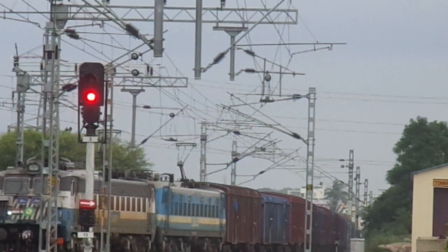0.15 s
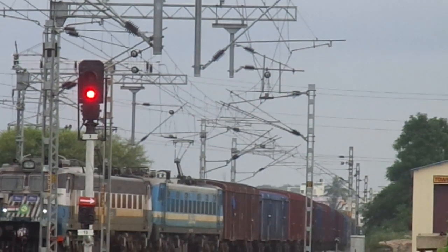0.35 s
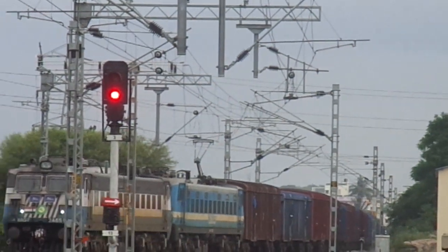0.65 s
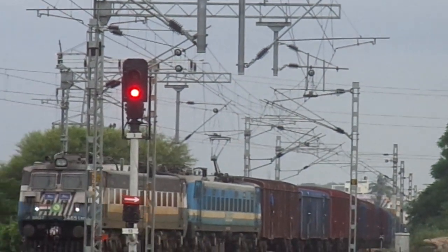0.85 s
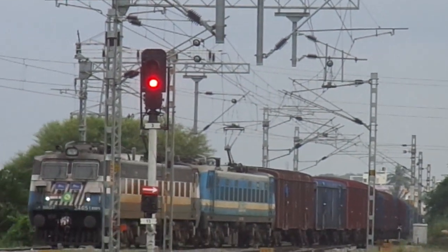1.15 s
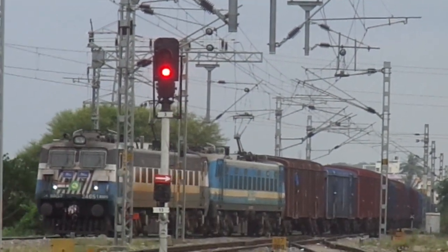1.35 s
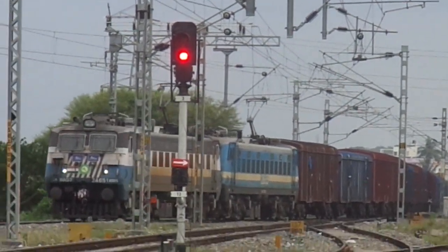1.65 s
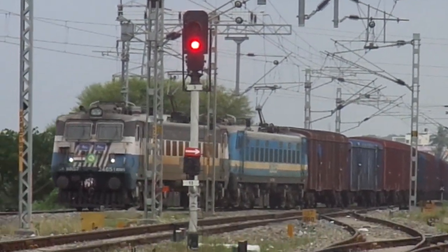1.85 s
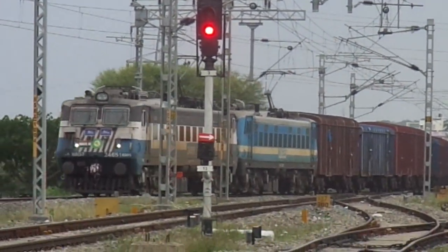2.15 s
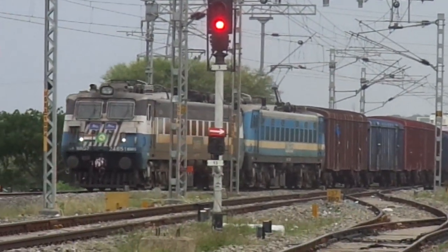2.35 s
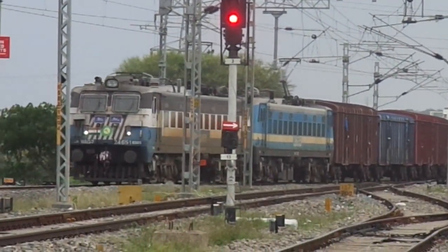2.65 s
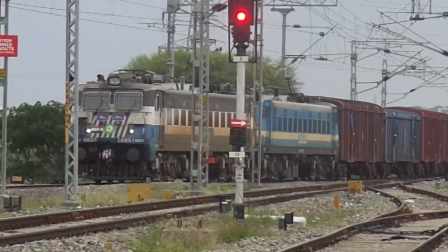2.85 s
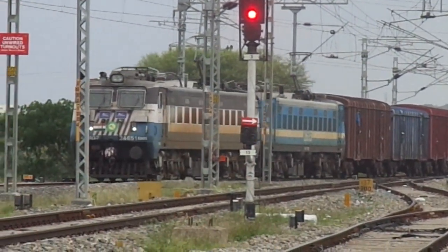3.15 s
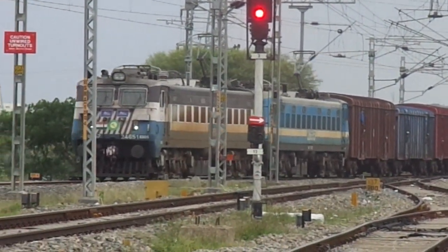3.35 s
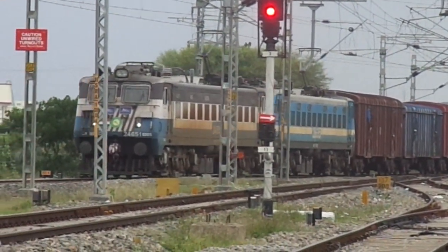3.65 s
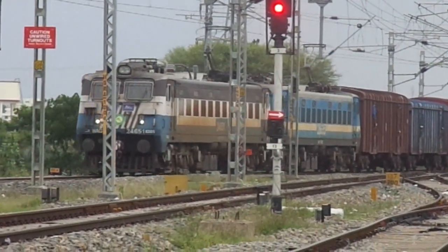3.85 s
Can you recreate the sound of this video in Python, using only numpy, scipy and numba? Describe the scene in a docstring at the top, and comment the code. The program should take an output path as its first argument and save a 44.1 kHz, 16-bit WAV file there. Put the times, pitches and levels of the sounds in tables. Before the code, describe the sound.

A train's loud, brassy air horn blares in three joined blasts across an open, windy railway yard.

```python
"""A railway yard in the open, where a goods train sounds its air horn in three joined blasts.
The horn is a sum of partials on one gliding pitch: slack air raises the pitch and dulls the tone.
Delayed, slightly flat copies and a decaying noise tail are the yard's masts and buildings. Filtered noise
with short thumps is wind on the microphone, gliding sines are a leak and a small bird, and shaped noise
with steady tones is the distant train. A limiter and hard clipping overload the horn's sharp pulses."""
import sys
import numpy as np
from scipy import signal
from scipy.fft import rfft, irfft
from scipy.io import wavfile
from scipy.ndimage import uniform_filter1d, map_coordinates
from numba import njit

SR = 44100
rng = np.random.default_rng(int(sys.argv[2]) if len(sys.argv) > 2 else 0)


def wav_out(sig):
    """Save sig, one row per channel (or a flat mono array), as 16-bit PCM at SR to the path in sys.argv[1]."""
    wavfile.write(sys.argv[1], SR, np.round(np.clip(np.atleast_2d(sig).T, -1, 1) * 32767).astype(np.int16))


N = 176400  # samples, 4 s

# Horn pitch, sharp when the air pressure is low: (time [s], fundamental [Hz])
HORN_PITCH = [(.585, 294), (.61, 291.1), (.67, 288.7), (.92, 289.3), (2.0, 289.1), (2.58, 289.2),
              (2.68, 290.6), (2.78, 294.4), (2.9, 296.8), (2.98, 298.3), (3.025, 293.8), (3.11, 289.4),
              (3.3, 288.5), (3.41, 290), (3.5, 293.4), (3.595, 296.3), (3.65, 292.5), (3.76, 289.9),
              (4.0, 288.6)]
# Horn partials relative to the brass level, interpolated between rows: (partial number, level [dB])
PARTIAL_LEVELS = [(1, -12.5), (2, -14), (5, -9.5), (6, -10.5), (7, -6.5), (8, -8), (9, -13), (10, -11.5),
                  (11, -9), (12, -12), (13, -11), (14, -11), (15, -14.5), (16, -19), (17, -18.5), (18, -15),
                  (20, -19.5), (22, -22), (24, -28), (25, -22.5), (26, -26.5), (27, -28.5), (28, -34),
                  (31, -37), (36, -38.5), (41, -45), (52, -58.5)]
# Third partial, on the bell's main resonance: (time [s], level [dB])
THIRD_PARTIAL = [(.6, -18), (1.15, -18), (1.43, -25), (1.58, -19), (1.8, -18.5), (1.97, -26), (2.28, -15.5),
                 (2.62, -13), (2.82, -16.5), (3.05, -9.5), (3.3, -9.5), (3.5, -16), (3.7, -15), (3.84, -12),
                 (4, -14)]
# Fourth partial: (time [s], level [dB])
FOURTH_PARTIAL = [(.6, -21.5), (1.1, -20), (1.36, -23), (1.52, -18), (1.9, -24), (2.28, -17), (2.42, -27),
                  (2.52, -18), (2.7, -23), (3.2, -27), (3.5, -19), (4, -15.5)]
# The other partials: (time [s], level [dB], brightness about the ninth partial [dB per octave])
BRASS_LEVEL = [(.6, -26, -3), (1.0, -22.5, -2.5), (1.4, -22, -1), (1.8, -22, -1), (2.1, -18.5, 2),
               (2.55, -18.5, 3), (3.05, -14.5, 0), (3.4, -17.5, 1), (3.68, -18.5, -1.5), (3.85, -18.5, -1),
               (4, -17, -1)]
# Broad treble peak that shifts as the train moves: (time [s], centre [Hz], height [dB])
TREBLE_PEAK = [(.6, 3300, 12), (.85, 3300, 4.5), (1.2, 2350, 2), (1.7, 2600, 1.5), (2.1, 3550, -1),
               (2.5, 3140, 3.5), (3.1, 4020, 3), (3.45, 4080, 8.5), (4, 3865, 4)]
# Horn sound scattered on the way, relative to the brass level: (partial number, level [dB])
SCATTERED_PARTIALS = [(1, -27), (2, -23), (3, -21), (5, -17), (6, -18), (9, -21), (12, -24), (16, -32),
                      (24, -42), (32, -54), (52, -68)]
# Spectrum of the air rushing through the horn: (frequency [Hz], level [dB])
AIR_SPECTRUM = [(200, -13), (900, -6), (4000, -7), (8000, -26), (15000, -45)]
# Yard echoes: (delay at time zero [s], Doppler flattening [share of pitch], level [dB], low-pass [Hz])
YARD_ECHOES = [(.07, .0034, -16, 3200), (.16, .012, -17, 3000), (.24, .023, -19, 1300)]
# Wind strength: (time [s], level [dB])
WIND_GUSTS = [(0, -50), (.09, -45), (.2, -55), (.42, -53), (.49, -41), (.6, -50), (.72, -47), (.81, -32),
              (.95, -38), (1.15, -34), (1.27, -23), (1.35, -34), (1.49, -22), (1.57, -28), (1.77, -22),
              (1.88, -33), (2.13, -39), (2.28, -23.5), (2.39, -22), (2.45, -30), (2.66, -31), (2.73, -22),
              (2.9, -33), (3.02, -30), (3.08, -43), (3.35, -39), (3.55, -32), (3.82, -32), (3.88, -21),
              (3.94, -17), (4, -23)]
# Single buffets on the microphone: (time [s], envelope peak [dB])
WIND_BUFFETS = [(.494, -26), (1.04, -19), (1.601, -9), (1.657, -11), (1.792, -11), (2.18, -7), (2.472, -10),
                (2.578, -13), (2.783, -11), (3.024, -12), (3.755, -11), (3.866, -7)]
# Wind rumble spectrum: (frequency [Hz], relative density [dB])
WIND_SPECTRUM = [(20, -30), (50, -16.5), (100, -7.5), (170, 0.5), (280, -0.5), (400, -15), (600, -23.5),
                 (900, -43), (2000, -53), (8000, -82)]
# Bird twitters: (start [s], length [s], first pitch [Hz], last pitch [Hz], level [dB])
BIRD_CHIRPS = [(0.012, 0.031, 5400, 3570, -52.5), (0.064, 0.031, 3700, 5900, -52),
               (0.204, .025, 3870, 4240, -68), (.315, .025, 5500, 4300, -67),
               (0.34, 0.021, 5350, 3900, -53), (0.362, 0.017, 3540, 4300, -54),
               (0.383, .04, 3700, 5850, -54)]
# Repeats of the bird off the yard: (delay [s], level [dB])
BIRD_REPEATS = [(.033, -11), (.075, -22), (.16, -16)]
# Rolling noise and outdoor hiss: (frequency [Hz], relative density [dB])
DISTANT_SPECTRUM = [(20, -9), (40, -4), (90, 1), (350, -25), (520, -8), (1170, -11), (2000, -20),
                    (3200, -21), (6700, -24.5), (7430, -29), (8400, -27), (9200, -18.5), (10000, -32),
                    (15000, -32)]
# Whine of the electric locomotive: (frequency [Hz], mean level [dB])
LOCOMOTIVE_WHINE = [(1278, -62), (2537, -61)]
# Hiss that differs between the ears: (frequency [Hz], relative density [dB])
SIDE_SPECTRUM = [(30, -3), (300, -7), (3000, -19), (15000, -19)]

FULL_AIR_HZ, SLACK_HZ = 290.21, 7.25  # pitch at full pressure; rise when the air is nearly shut
# Loss when nearly shut [dB]; extra loss [dB per octave above the third partial]; exponent on the rise
SLACK_DB, SLACK_DULL_DB, SLACK_POWER = 9, 9, 2.43
VALVE_S, ATTACK_S, AIR_DB = .581, .026, -35  # valve opens; time to open fully; level of the rushing air
PEAK_OCTAVES = .18  # standard deviation of the treble peak
FADE_DB, FADE_RATE, SCATTER_RATE = 2.5, 3.04, 8  # turbulent air on the way; rates in random knots per s
PITCH_JITTER, PHASE_WANDER = .0001, .52  # share of pitch; rad
YARD_DB, YARD_T60_S, YARD_HZ = -28, .8, 2400  # tail level, decay by 60 dB, low-pass
LEAK_START_S, LEAK_LENGTH_S = .495, .11
LEAK_FIRST_HZ, LEAK_LAST_HZ, LEAK_DB = 1590, 1562, -50
WIND_FLUTTER_DB, WIND_FLUTTER_RATE = 4, 80  # spread; random knots per s
WIND_EDGE_DB, WIND_EDGE_HZ = -7.5, 420  # rough part of strong gusts
BUFFET_S, BUFFET_HZ, BUFFET_TAIL_S, BUFFET_TAIL_DB = .0022, 268, .0074, -12.5
DISTANT_DB, SIDE_DB = -46.5, -60
# Limiter threshold [amplitude], step down [dB], recovery [dB per s]
LIMIT, LIMIT_STEP_DB, LIMIT_RECOVER_DB_PER_S = 1.5, 2.2, 34
CEILING, TOP_HZ = .98, 15100  # clipping amplitude; upper band limit


def undb(db):
    """Amplitude ratio: 20 dB is a factor of ten."""
    return 10 ** (np.asarray(db) / 20)


def curve(table, at, column=1):
    """Linear interpolation through the rows of a table."""
    table = np.array(table, float)
    return np.interp(at, table[:, 0], table[:, column])


def walk(rate):
    """Band-limited random drift: a cubic spline through `rate` Gaussian knots per second, spread near 1."""
    knots = rng.standard_normal(int(rate * N / SR) + 4)
    place = np.arange(0, N + 64, 64)
    drift = map_coordinates(knots, [1 + place / SR * rate], order=3)
    return np.interp(np.arange(N), place, drift)


def noise(points):
    """Spectral shaping: white noise weighted in frequency by (frequency [Hz], level [dB]), rms 1."""
    hz, db = np.array(points, float).T
    f = np.maximum(np.fft.rfftfreq(N, 1 / SR), 1)
    weight = undb(np.interp(np.log(f), np.log(hz), db))
    y = irfft(rfft(rng.standard_normal(N)) * weight, N)
    return y / y.std()


def band(x, hz, kind="low", order=2):
    """Butterworth filtering: maximally flat in the passband."""
    sos = signal.butter(order, np.minimum(hz, SR / 2 - 1), kind, fs=SR, output="sos")
    return signal.sosfilt(sos, x)


def glide(t, start, length, first_hz, last_hz):
    """Frequency modulation: phase is the integral of a linearly gliding pitch, with rounded ends."""
    u = np.clip((t - start) / length, 0, 1)
    envelope = np.sqrt(2 * np.abs(np.sin(np.pi * u)))
    hz = first_hz + (last_hz - first_hz) * u
    return envelope * np.sin(2 * np.pi * np.cumsum(hz) / SR)


def horn(t):
    """Harmonic pulses of a diaphragm: slack air swings it sharper in pitch, weaker and duller."""
    hz = curve(HORN_PITCH, t)
    slack = (np.maximum(hz - FULL_AIR_HZ, 0) / SLACK_HZ) ** SLACK_POWER
    phase = 2 * np.pi * np.cumsum(hz * (1 + PITCH_JITTER * walk(60))) / SR
    opening = np.clip((t - VALVE_S) / ATTACK_S, 0, 1)
    brass, bright = curve(BRASS_LEVEL, t), curve(BRASS_LEVEL, t, column=2)
    peak_octave = np.log2(curve(TREBLE_PEAK, t) / FULL_AIR_HZ)
    peak_db = curve(TREBLE_PEAK, t, column=2)
    tone = np.zeros(N)
    for k in range(1, 53):
        above_bell = max(np.log2(k / 3), 0)  # octaves
        above_middle = max(np.log2(k / 9), -.5)  # octaves
        if k in (3, 4):
            db = curve(THIRD_PARTIAL if k == 3 else FOURTH_PARTIAL, t)
        else:
            fade = FADE_DB * walk(FADE_RATE)
            db = brass + curve(PARTIAL_LEVELS, k) + bright * above_middle + fade
            db = db + peak_db * np.exp(-.5 * ((np.log2(k) - peak_octave) / PEAK_OCTAVES) ** 2)
        angle = k * phase + 1.5 / np.sqrt(k) + PHASE_WANDER * walk(1.5)
        direct = undb(db) * np.cos(angle)
        # Independent drifts in quadrature beat against the direct sound
        beating = (walk(SCATTER_RATE) * np.cos(angle) + walk(SCATTER_RATE) * np.sin(angle)) / np.sqrt(2)
        scattered = undb(brass + curve(SCATTERED_PARTIALS, k)) * beating
        attack = opening ** (1 + above_bell / 2)  # high partials build up later
        slack_loss = undb(-slack * (SLACK_DB + SLACK_DULL_DB * above_bell))
        tone += (direct + scattered) * attack * slack_loss
    air = noise(AIR_SPECTRUM) * (1 + .7 * np.cos(phase))  # pulses with the diaphragm
    return np.sqrt(2) * tone + air * opening * undb(brass + AIR_DB - SLACK_DB * slack)


def yard(x, t):
    """Reflection and Doppler shift: a growing delay flattens each dull echo, over a thin diffuse tail."""
    echoes = np.zeros(N)
    for delay, flat, db, top_hz in YARD_ECHOES:
        echoes += undb(db) * np.interp(t - delay - flat * t, t, band(x, top_hz), left=0)
    tail = band(rng.standard_normal(N), YARD_HZ) * undb(-60 * t / YARD_T60_S) * (t > .02)
    tail = tail / np.sqrt(np.sum(tail ** 2))  # unit energy
    return echoes + undb(YARD_DB) * signal.fftconvolve(x, tail)[:N]


def leak(t):
    """Harmonic whistle: a falling tone and its weaker octave, with a quickly wavering level."""
    level = undb(LEAK_DB + 2 * walk(110))
    whistle = np.zeros(N)
    for k in (1, 2):
        whistle += glide(t, LEAK_START_S, LEAK_LENGTH_S, k * LEAK_FIRST_HZ, k * LEAK_LAST_HZ) / k
    return level * whistle


def wind(t):
    """Turbulent pressure on the microphone: fluttering gusts, rougher when strong, with single thumps."""
    force = undb(curve(WIND_GUSTS, t) + WIND_FLUTTER_DB * walk(WIND_FLUTTER_RATE))
    edge = band(rng.standard_normal(N), np.array([.7, 1.35]) * WIND_EDGE_HZ, "band")
    rumble = noise(WIND_SPECTRUM)
    roughness = undb(WIND_EDGE_DB) * np.minimum(force / .1, 1.5)
    out = force * (rumble + roughness * edge / edge.std())
    for at, db in WIND_BUFFETS:
        age = t - at
        cycles = BUFFET_HZ * age * rng.uniform(1.0, 1.41) + rng.random()
        thump = np.exp(-(age / BUFFET_S) ** 2) * np.cos(2 * np.pi * cycles)
        tail = rumble * np.exp(-np.abs(age) / BUFFET_TAIL_S)  # on both sides of the thump
        out += undb(db) * (thump + undb(BUFFET_TAIL_DB) * tail)
    return out


def bird(t):
    """Frequency glides and reflection: quick falling and rising twitters, repeated faintly off the yard."""
    calls = np.zeros(N)
    for start, length, first_hz, last_hz, db in BIRD_CHIRPS:
        calls += undb(db) * glide(t, start, length, first_hz, last_hz)
    repeats = np.zeros(N)
    for delay, db in BIRD_REPEATS:
        repeats += undb(db) * np.interp(t - delay, t, calls, left=0)
    return calls + repeats


def distant_train(t):
    """Broadband and tonal sources: rolling noise with outdoor hiss, and whine at fixed frequencies."""
    whine = np.zeros(N)
    for hz, db in LOCOMOTIVE_WHINE:
        whine += np.sqrt(2) * undb(db + 2 * walk(6.7)) * np.sin(2 * np.pi * hz * t)
    return noise(DISTANT_SPECTRUM) * undb(DISTANT_DB + .6 * walk(7.4)) + whine


def scene():
    """Superposition: all sources arrive equally at both ears; a faint hiss of opposite sign differs."""
    t = np.arange(N) / SR
    blast = horn(t)
    mid = blast + yard(blast, t) + leak(t) + wind(t) + bird(t) + distant_train(t)
    side = undb(SIDE_DB) * noise(SIDE_SPECTRUM)
    return np.array([mid + side, mid - side])


@njit
def limiter(peak, limit, step_db, recover_db):
    """Gain control by feedback: the gain [dB] steps down when the sound passes the limit, then creeps back."""
    out, db = np.empty(len(peak)), 0.
    for i in range(len(peak)):
        db = min(db + recover_db / SR, 0.)
        if peak[i] * 10 ** (db / 20) > limit:
            db -= step_db
        out[i] = db
    return out


def record(dry):
    """Overload: a limiter lowers the gain, peaks above the ceiling clip, and a steep low-pass cuts the top."""
    peak = np.abs(dry).max(axis=0)
    db = limiter(peak, float(LIMIT), float(LIMIT_STEP_DB), float(LIMIT_RECOVER_DB_PER_S))
    gain = undb(uniform_filter1d(db, size=64))  # steps smoothed over 64 samples
    clipped = np.clip(dry * gain, -CEILING, CEILING)
    return signal.sosfilt(signal.ellip(10, .1, 80, TOP_HZ, fs=SR, output="sos"), clipped)


dry = scene()
out = record(dry)
wav_out(out)
```